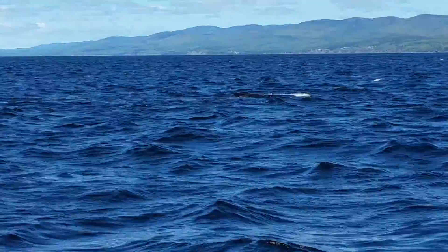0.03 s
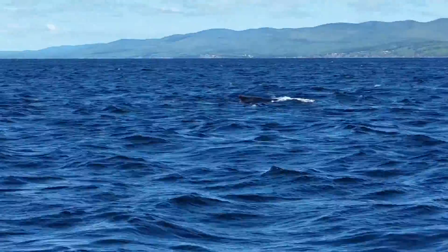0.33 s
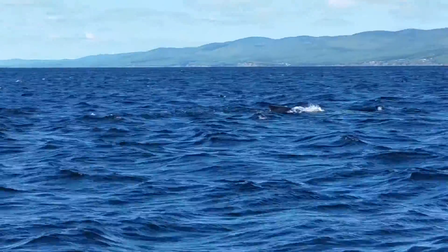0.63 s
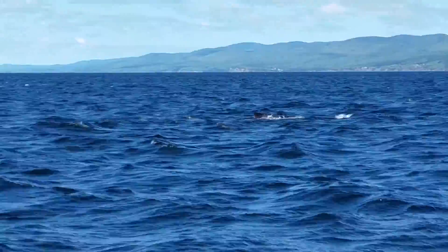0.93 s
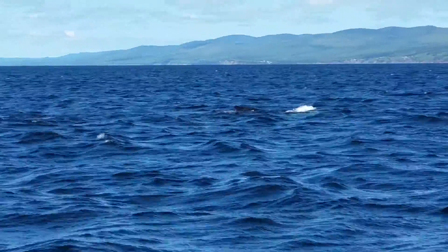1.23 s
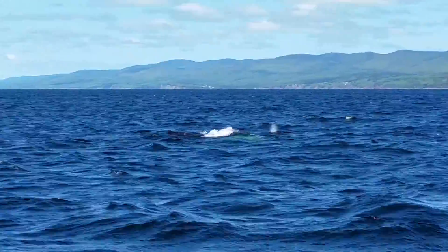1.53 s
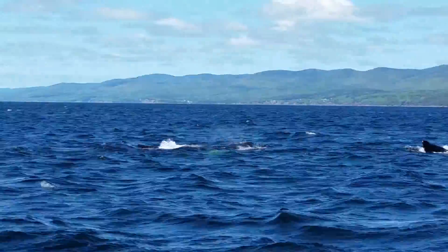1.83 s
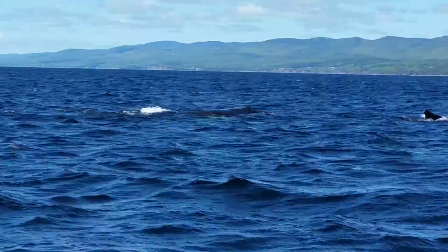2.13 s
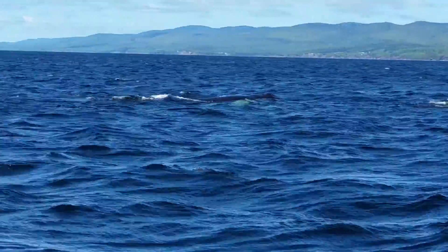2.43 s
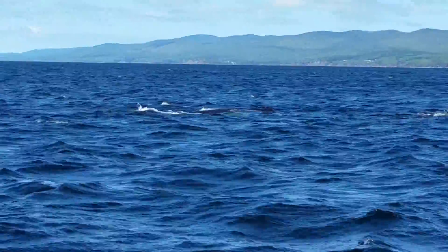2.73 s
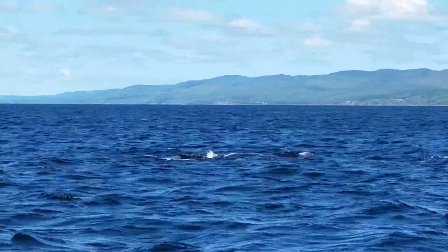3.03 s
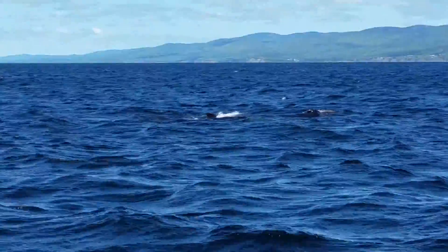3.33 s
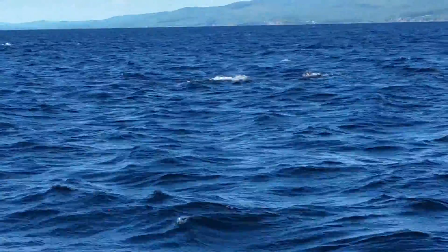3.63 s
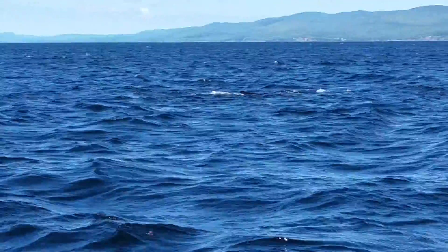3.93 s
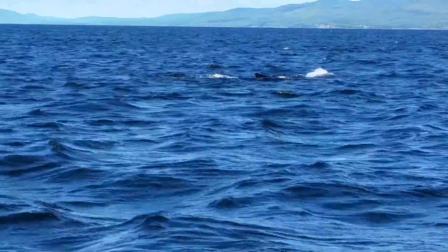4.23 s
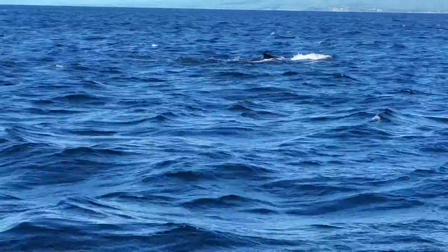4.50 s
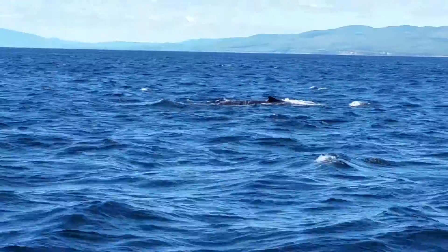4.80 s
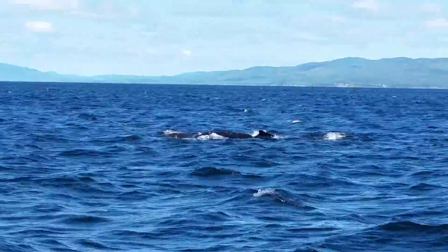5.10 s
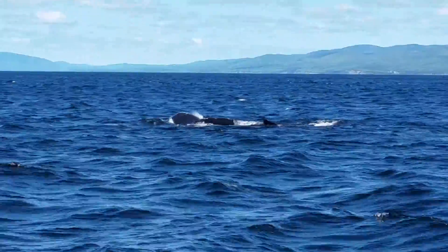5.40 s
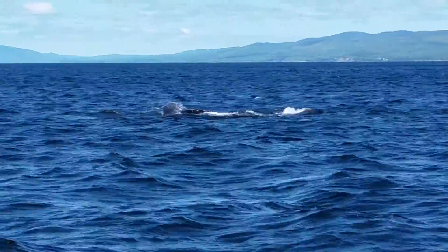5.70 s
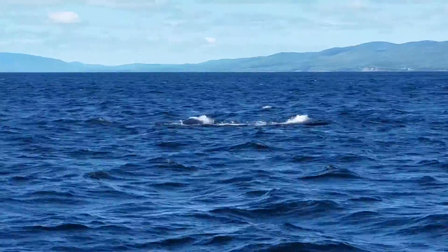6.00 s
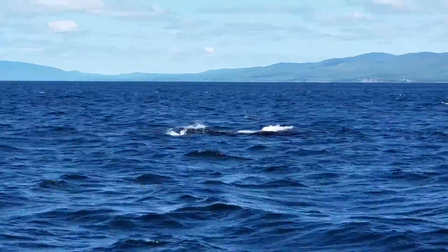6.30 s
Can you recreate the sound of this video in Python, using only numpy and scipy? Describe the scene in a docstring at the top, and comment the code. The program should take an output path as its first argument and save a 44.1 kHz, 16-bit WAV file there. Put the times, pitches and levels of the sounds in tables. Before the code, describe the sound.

Choppy sea sloshes against an idling small boat, with soft bursts of splashing spray and gusty wind buffeting the microphone.

```python
"""A small boat idles on a choppy sea, heard on deck through a stereo microphone.
From the start, wind eddies thump and pop on its ports, mostly the left, over engine hum and hull rumble.
Soon the chop picks up: waves slosh along the hull, trapped air gurgles, stray drops splat on the deck,
and every second or so a crest breaks into a bubbly wash and fizzing spray.
Near the end a strong gust buffets both ports, and at about 6 s the biggest crest breaks."""
import sys
import numpy as np
from scipy import signal
from scipy.fft import rfft, irfft, next_fast_len
from scipy.io import wavfile
from scipy.ndimage import uniform_filter1d, minimum_filter1d

SR = 44100
rng = np.random.default_rng(int(sys.argv[2]) if len(sys.argv) > 2 else 0)


def master_out(mix):
    """Clip the mix to full scale and print it as 16-bit PCM to the path in sys.argv[1]."""
    frames = np.transpose(np.atleast_2d(mix))
    ceiling = np.clip(frames, -1, 1)
    pcm = np.round(ceiling * 32767).astype(np.int16)
    wavfile.write(sys.argv[1], SR, pcm)


N = 288855
TIME = np.arange(N) / SR

# Levels in the tables are relative: each layer adds its own trim.
# The idling engine's tones. Each row: frequency in Hz, level in dB.
ENGINE_ORDERS = [(33.3, -44), (66.6, -35.5), (99.9, -41)]
# Tone colours of hull, slosh, mist and a drop's splat. Each row: frequency in Hz, gain in dB.
RUMBLE_EQ = [(15, -31.5), (35, 11), (52, -3), (68, 22), (90, -9.5), (140, -3.5), (220, -11.5), (400, -18),
             (900, -113.5)]
SLOSH_EQ = [(40, -4), (120, 12), (220, 7), (330, 4.5), (480, 0), (700, -1.5), (900, -10), (1400, -23.5),
            (3000, -89)]
MIST_EQ = [(7000, -53), (11000, -21), (13000, -9), (15000, 1.5)]
SPLAT_EQ = [(1500, -31), (4500, -10), (8000, -20), (11000, 13), (15000, -1)]
# Wash and spray as the ports colour them. Each row: frequency in Hz, left gain in dB, right gain in dB.
WASH_EQ = [(300, -22, -41), (740, -3, 0.5), (1460, 5.5, 5.5), (1780, 2, 0.5), (2250, 0, 2),
           (3060, -16.5, -7), (3470, -20.5, -9.5), (4210, -7.5, -19.5), (5300, -27.5, -22.5),
           (7000, -49.5, -45.5), (12000, -47.5, -43.5)]
SPRAY_EQ = [(400, -32.5, -29), (1300, -7, -23), (1650, -10, -24), (2100, -8.5, -14), (2600, -25.5, -19),
            (3150, -36.5, -6.5), (4100, -17, -6.5), (4750, -26.5, -13), (6030, -24.5, -10),
            (8220, -23, -21), (10230, -2, -15), (11200, 0, -10), (14300, -8, -2), (15000, -12.5, 3)]
# The large bubbles' part of the wash, and the coarse drops' part of the spray.
# Each row: frequency in Hz, gain in dB.
BODY_EQ = [(600, -21), (950, -7), (1400, 3), (1900, -17)]
COARSE_EQ = [(7500, -8), (10000, -16)]
# Fine mist drifting past. Each row: time in seconds, level in dB.
MIST_FADER = [(0, -79.5), (.55, -53), (1.1, -53), (2, -69), (3.4, -47), (4, -46), (4.7, -60), (5, -50),
              (5.3, -46), (5.7, -52), (6.55, -44)]
# The bed of wind on the ports. Each row: time in seconds, left level in dB, right level in dB.
WIND_FADER = [(0, -21, -15.5), (.3, -8, -42), (.52, -23.5, -26), (.75, -37.5, -34), (1, -22, -37),
              (1.2, -23, -50), (1.42, -22, -15.5), (1.8, -16, -27), (2.8, -24, -27), (3.2, -14, -20.5),
              (3.9, -13.5, -26.5), (4.3, -16.5, -22), (4.6, -18, -38), (4.95, -28, -26.5),
              (5.25, -13.5, -20.5), (5.68, -7.5, -13.5), (6, -23.5, -25), (6.55, -26, -26.5)]
# The hardest eddies. Each row: peak time in seconds, length in seconds, level in dB, corner in Hz,
# level of the pop in dB, port (0 left, 1 right).
HARD_EDDIES = [(0.074, 0.04, -6.5, 265, -15, 0), (0.103, 0.039, -10.5, 260, -19.5, 0),
               (0.147, 0.014, -6, 227, -20, 0), (0.187, .03, -12.5, 260, -27.5, 0),
               (0.254, 0.012, -11.5, 235, -19.5, 0), (0.283, 0.01, -17, 223, -17, 0),
               (.301, 0.017, -13.5, 300, -22.5, 0), (0.348, 0.022, -12, 200, -16.5, 0),
               (0.394, 0.022, -7, 188, -21.5, 0), (0.583, 0.12, -23.5, 160, -52, 0),
               (0.873, .06, -22.5, 177, -50, 0), (0.931, 0.041, -21, 224, -31, 0),
               (1.056, 0.035, -21, 157, -49, 1), (1.366, 0.027, -20.5, 255, -42, 0),
               (1.428, 0.042, -15, 160, -42, 0), (1.653, 0.032, -7, 160, -35, 0),
               (1.735, 0.014, -6.5, 183, -11, 0), (1.77, 0.027, -4.5, 172, -19, 0),
               (1.863, 0.021, -14.5, 206, -23.5, 0), (2.002, 0.016, -6, 235, -19.5, 0),
               (2.167, 0.02, -17.5, 190, -24, 0), (2.411, 0.014, -13, 155, -61, 0),
               (2.714, 0.022, -14.5, 190, -15.5, 0), (2.987, 0.028, -6, 132, -42, 0),
               (3.185, 0.016, -3, 177, -36, 0), (3.273, 0.031, -16.5, 160, -38, 1),
               (3.374, 0.016, -2, 163, -16, 0), (3.428, 0.0083, -14, 190, -18.5, 0),
               (3.746, 0.014, -6.5, 200, -25, 0), (3.829, 0.016, -10.5, 177, -23, 0),
               (3.886, .016, -5, 161, -11, 0), (4.045, 0.018, -1, 208, -9, 0),
               (4.159, 0.01, -17, 230, -16, 0), (4.2, 0.0094, -12, 175, -12, 0),
               (4.719, 0.015, -15.5, 130, -52, 1), (4.829, 0.028, -22, 170, -29.5, 0),
               (5.178, .022, -17.5, 125, -35, 1), (5.238, 0.029, -12, 138, -28, 0),
               (5.564, 0.034, -0.5, 185, -18, 0), (5.713, 0.024, -6, 163, -36, 1),
               (5.744, .02, -5, 104, -38, 1), (5.804, 0.0314, -10.5, 200, -16, 0)]
# How hard the chop works the hull; rumble, slosh, wash, foam and spray all ride on it.
# Each row: time in seconds, level in dB.
CHOP_FADER = [(0, -58.5), (.55, -55), (1.1, -54), (1.4, -51.5), (1.95, -50.5), (2.08, -48), (2.42, -48),
              (2.62, -48), (3.2, -47), (3.5, -48), (3.85, -44), (4.3, -54.5), (4.85, -59), (5.15, -52.5),
              (5.4, -46.5), (5.55, -45.5), (5.68, -42.5), (5.8, -43), (6.55, -44.5)]
# Air that waves trap at the hull. Each row: start in seconds, pitch in Hz, level in dB.
AIR_POCKETS = [(.945, 598, -37), (1.2, 683, -38), (2.025, 582, -34), (2.405, 452, -34.5),
               (3.649, 431, -32.5), (4.3, 367, -43), (4.96, 714, -44.5), (5.615, 1317, -36),
               (5.66, 1140, -35.5), (5.68, 726, -26.5), (6.21, 413, -34)]
# Drops landing close by. Each row: start in seconds, peak level in dB.
DECK_DROPS = [(.872, -35), (.896, -32), (.933, -35), (.94, -41), (2.372, -29), (3.107, -25), (3.985, -30),
              (4.281, -31), (4.489, -35), (4.534, -30), (4.573, -39), (6.411, -19)]
# Breaking crests. Each row: middle of the hold in seconds, hold in seconds, build in dB per second,
# spray, wash and foam levels in dB, foam pitch in Hz, the spray's pan as left minus right in dB.
BREAKERS = [(0.561, .14, 79, -47, -57, -52.5, 3580, -2.5), (1.617, .1, 52, -38.5, -42, -50.5, 3440, 0),
            (1.684, 0.025, 217, -35.5, -53, -45, 3600, -4.5), (2.38, 0.11, 70, -47.5, -56, -62, 3120, 5),
            (2.912, .12, 136, -34.5, -47, -43, 2510, 1.5), (3.327, 0.38, 81.5, -59, -56, -50, 4270, -8),
            (4.135, .15, 108.5, -38, -59, -48.5, 2840, -2), (4.562, .07, 150, -57, -53.5, -70, 2960, 8),
            (5.444, 0.093, 96, -60.5, -50, -54, 4210, -15),
            (6.059, 0.17, 125, -22.5, -37.5, -40.5, 3820, 3)]

ROUGH_DB = -47  # the chop level that counts as rough water


def undb(db):
    """Decibels to gain."""
    return 10 ** (np.asarray(db) / 20)


def unit(x):
    """Scale to rms 1."""
    return x / np.sqrt(np.mean(x ** 2) + 1e-18)


def together(*levels_db):
    """Level in dB of unrelated sounds heard at once."""
    return 10 * np.log10(sum(undb(db) ** 2 for db in levels_db) + 1e-18)


def blend(levels_db, values):
    """Average the values, each weighted by the power of its sound."""
    power = undb(levels_db) ** 2
    return np.asarray(values) @ power / power.sum(axis=0)


def faders(table):
    """Each level column as a fader ride, in straight lines between its points."""
    times, *columns = np.transpose(table)
    return np.array([np.interp(TIME, times, levels) for levels in columns])


def colour(x, eq):
    """Apply an EQ curve with one dB column, or one for each channel."""
    hz, *columns = np.transpose(eq)
    size = next_fast_len(x.shape[-1])
    log_hz = np.log(np.arange(size // 2 + 1) * SR / size + 1e-3)
    gain = undb([np.interp(log_hz, np.log(hz), db) for db in columns])
    return irfft(rfft(x, size) * gain, size)[:, :x.shape[-1]]


def drift(rate_hz):
    """Smooth random wobble of rms 1."""
    step = max(int(SR / rate_hz), 2)
    held = np.repeat(rng.standard_normal(N // step + 2), step)
    return unit(uniform_filter1d(held, step)[:N])


def add(track, start_s, sound):
    """Mix a one-shot into a track."""
    start = max(int(start_s * SR), 0)
    part = sound[..., :max(N - start, 0)]
    track[..., start:start + part.shape[-1]] += part


def at_ports(x, lag_s):
    """Sound from the left side of the boat reaches the right port a little later."""
    return np.array([x, np.interp(TIME - lag_s, TIME, x)])


def engine():
    """Low, slightly unsteady engine orders over a hull that rumbles more in a rough sea."""
    wavering_time = np.cumsum(1 + 0.02543 * drift(9)) / SR
    hum = sum(undb(db + 0.83 * drift(11)) * unit(np.sin(2 * np.pi * hz * wavering_time))
              for hz, db in ENGINE_ORDERS)
    rumble_db = -32 + 0.94 * (faders(CHOP_FADER)[0] - ROUGH_DB)
    rumble = unit(colour(rng.standard_normal(N), RUMBLE_EQ))
    return undb(-1) * hum + undb(rumble_db) * rumble


def mist():
    """The finest droplets make a thin, airy hiss on the right."""
    hiss = unit(colour(rng.standard_normal(N), MIST_EQ))
    trim_db = np.array([[-14], [-1]])
    return hiss * undb(faders(MIST_FADER) + 1.2 * drift(20) + trim_db)


def turbulence(noise, corner_hz, low_cut_hz):
    """Pressure on a port: flat from the low cut to a corner set by air speed, then falling steeply."""
    size = next_fast_len(noise.shape[-1])
    hz = np.arange(size // 2 + 1) * SR / size + 1e-3
    power = 1 / (1 + (hz / corner_hz) ** 6) / (1 + (low_cut_hz / hz) ** 4)
    return irfft(rfft(noise, size) * np.sqrt(power), size)[..., :noise.shape[-1]]


def small_eddies(wind_db, count):
    """Cues for weak eddies at random times, their level riding on the wind bed."""
    rows = []
    for k, (late, stretch, weakness, speed) in enumerate(rng.random((count, 4))):
        peak = int((k + late) / count * (N - 1))
        length_s = 0.019 * (.5 + stretch)
        corner_hz = 160 * 2 ** (speed - .5)
        rows.append((peak / SR, length_s, wind_db[peak] - 2 * weakness, corner_hz))
    return rows


def eddies(rows, trim_db):
    """Thumps of turbulence that rise faster than they die; small fast ones are brighter, with less bass."""
    out = np.zeros(N)
    t = (np.arange(8192) - 4096) / SR
    for peak_s, length_s, db, corner_hz, *_ in rows:
        width_s = length_s * np.where(t < 0, .68, .95)
        swell = np.exp(-np.log(4) * np.abs(t / width_s) ** 2.6)
        low_cut_hz = 26 * (corner_hz / 170) ** 0.21
        pressure = turbulence(rng.standard_normal(len(t)), corner_hz, low_cut_hz)
        thump = unit(pressure * swell) * np.sqrt(np.mean(swell ** 2))
        start_s = peak_s + t[0]
        skip = max(int(-start_s * SR), 0)
        add(out, start_s, undb(db + trim_db) * thump[skip:])
    return out


def pops(rows):
    """A vortex core crosses the port as one sharp pressure pulse; a run of them makes a tearing sound."""
    out = np.zeros(N)
    lead_s = .04
    hz = np.arange(4097) * SR / 8192
    port_highpass = (1j * hz / (1j * hz + 260)) ** 2
    for peak_s, eddy_s, _, corner_hz, db, _ in rows:
        length_s = .26 * eddy_s
        rolloff_hz = 243.5 * (corner_hz / 200) ** 1.98  # faster eddies pop brighter
        count = int(np.clip(length_s / .003, 1, 8))
        late, polarity = rng.random((2, 8))[:, :count]
        pulse_s = lead_s + length_s * ((np.arange(count) + .2 + .6 * late) / count - .5)
        spectrum = np.sign(polarity - .5) @ np.exp(-2j * np.pi * np.outer(pulse_s, hz))
        pop = irfft(spectrum * port_highpass * np.exp(-hz / rolloff_hz))
        add(out, peak_s - lead_s, undb(db) * pop * np.sqrt(length_s * SR / np.sum(pop ** 2)))
    return out


def wind():
    """A bed of fluttering flow, unrelated at the two ports, with eddies and their pops on top."""
    wind_db = faders(WIND_FADER)
    flutter = undb(2.83 * np.array([drift(28), drift(28)]))
    flow = turbulence(rng.standard_normal((2, N)), corner_hz=133, low_cut_hz=47.6)
    out = unit(flow * flutter) * undb(wind_db + np.array([[-5.2], [-4.2]]))
    for port, trim_db in enumerate([2.53, 1.8]):
        hard = [row for row in HARD_EDDIES if round(row[-1]) == port]
        weak = small_eddies(wind_db[port], count=20)
        out[port] += eddies(hard + weak, trim_db) + pops(hard)
    return out


def drops():
    """Single drops splat on the deck and break into finer ones."""
    out = np.zeros((2, N))
    t = np.arange(2048) / SR
    snap_and_tail = np.exp(-t / 0.0022) + .15 * np.exp(-t / 0.0098)
    for start_s, db in DECK_DROPS:
        splat = colour(rng.standard_normal((2, len(t))), SPLAT_EQ) * snap_and_tail
        add(out, start_s, undb(db) * splat / np.abs(splat).max())
    return out


def bubble(hz, cycles, glide):
    """A ringing air pocket; its pitch rises as it nears the surface."""
    age = np.linspace(0, 1, int(cycles * SR / hz) + 2)
    chirp = np.sin(2 * np.pi * cycles * (age + glide * age ** 2 / 2))
    attack = 1 - np.exp(-age * cycles)
    return chirp * attack * np.exp(-np.log(100) * age)


def bubble_cloud(low_hz, high_hz, cycles, spread_db, count):
    """Bubbles of all sizes, scattered between left and right."""
    out = np.zeros((2, N))
    for when, pitch, weakness, left_share, life in rng.random((count, 5)):
        ring = bubble(low_hz * (high_hz / low_hz) ** pitch, cycles * (.5 + life), glide=0.16)
        pan = np.sqrt([[left_share], [1 - left_share]])
        add(out, when * N / SR, pan * undb(-spread_db * weakness) * ring)
    return unit(out)


def gurgles():
    """A trapped pocket of air breaks into a quick run of bubbles of nearly one size."""
    out = np.zeros(N)
    for start_s, hz, db in AIR_POCKETS:
        for k, (late, detune) in enumerate(rng.random((4, 2))):
            ring = bubble(hz * (1 + 0.14 * (detune - .5)), cycles=54, glide=0.21)
            add(out, start_s + 0.014 * (k + late), undb(db - 0.5 * k) * ring)
    return out


def slosh(level_db):
    """Water heaving against the hull: a churn much alike at both ports, and big glugging bubbles."""
    noise = at_ports(rng.standard_normal(N), lag_s=0.0002) + 0.44 * rng.standard_normal((2, N))
    churn = unit(colour(noise * undb(2 * drift(35)), SLOSH_EQ))
    glugs = bubble_cloud(low_hz=270, high_hz=620, cycles=18, spread_db=14, count=520)
    return undb(level_db) * (undb(2) * churn + undb(-6) * glugs)


def wash(level_db, body_db, pan_db):
    """Crests tumbling into foam: a rush full of small bubbles, swaying gently with the spray's pan."""
    rush = unit(rng.standard_normal((2, N)) + 0.88 * at_ports(rng.standard_normal(N), lag_s=0.00033))
    froth = undb(-17) * bubble_cloud(low_hz=900, high_hz=4500, cycles=14, spread_db=16, count=3600)
    water = unit(colour(rush * undb(1.78 * drift(30)) + froth, WASH_EQ))
    water += colour(water, BODY_EQ) * (undb(body_db) - 1)
    lean_db = 0.12 * (pan_db - 4.5) * np.array([[1], [-1]])
    return undb(level_db + lean_db) * water


def foam(level_db, pitch_hz):
    """Foam fizzes in a band set by the size of its bubbles, which changes from wave to wave."""
    out = np.zeros((2, N))
    for hz in np.geomspace(2300, 4400, num=9):
        noise = rng.standard_normal((2, N)) + 0.71 * at_ports(rng.standard_normal(N), lag_s=0.00037)
        band = unit(colour(noise, [(hz / 1.2, -60), (hz / 1.04, 0), (hz * 1.04, 0), (hz * 1.2, -60)]))
        out += band * np.exp(-(np.log(hz / pitch_hz) / 0.22) ** 2)
    return undb(level_db - 7.5) * unit(out)


def spray(level_db, pan_db, clicks_per_s=2500):
    """Countless droplets and bursting foam cells, each a tiny click, over a smooth hiss."""
    hiss = rng.standard_normal((2, N))
    sizes = undb(3.6 * np.minimum(rng.exponential(size=(2, N)), 4.5))
    clicks = rng.standard_normal((2, N)) * sizes * (rng.random((2, N)) < clicks_per_s / SR)
    fizz = colour((hiss + undb(-3.5) * unit(clicks)) * undb(drift(45)), SPRAY_EQ)
    fizz = np.array([unit(channel) for channel in fizz])
    # a weak crest throws only fine mist, without the coarse drops that sound lower
    fizz -= colour(fizz, COARSE_EQ) * (1 - undb(0.12 * (level_db + 25)))
    fizz *= undb(.9 * drift(16))
    left_share = 1 / (1 + undb(-pan_db) ** 2)
    pan = np.sqrt(2 * np.array([left_share, 1 - left_share]))
    return undb(level_db - 0.67) * pan * fizz


def crest_envelope(middle_s, hold_s, build_db_per_s):
    """Envelope in dB of a crest that builds, holds and drains, leaving a softer tail of fizz."""
    before_s = np.maximum(middle_s - hold_s / 2 - TIME, 0)
    after_s = np.maximum(TIME - middle_s - hold_s / 2, 0)
    drain_db = -69.5 * after_s
    tail_db = -11.5 - 17.5 * after_s
    return together(drain_db, tail_db) - build_db_per_s * before_s


def sea():
    """The chop keeps the water moving; laps at the hull and breaking crests swell over it."""
    chop_db = faders(CHOP_FADER)[0]
    middle_s, hold_s, build, spray_db, wash_db, foam_db, foam_hz, crest_pan_db = np.transpose(BREAKERS)
    envelopes = np.array([crest_envelope(*crest) for crest in zip(middle_s, hold_s, build)])
    # each wave that traps an air pocket also laps the hull
    laps_db = together(*(db + 10 * np.log10(np.exp(-((TIME - lap_s) / 0.041) ** 2) + 1e-18)
                         for lap_s, _, db in AIR_POCKETS))
    breaking_db = together(*(wash_db[:, None] + envelopes))
    # each list holds the chop's level first, then the crests'
    washes = [together(chop_db, laps_db - 16.5), breaking_db]
    foams = [chop_db - 16.5, *(foam_db[:, None] + envelopes)]
    sprays = [-52 + 1.27 * (chop_db - ROUGH_DB), *(spray_db[:, None] + envelopes)]
    pan_db = blend(sprays, [0, *crest_pan_db])
    return (slosh(together(chop_db + 9, laps_db - 2.5, breaking_db + 2))
            + wash(together(*washes), body_db=blend(washes, [-1.5, -5.5]), pan_db=pan_db)
            + foam(together(*foams), pitch_hz=blend(foams, [3970, *foam_hz]))
            + spray(together(*sprays), pan_db))


def scene():
    """The stereo mix of wind, engine and water."""
    return wind() + engine() + sea() + gurgles() + mist() + drops()


def record(dry):
    """A limiter ducks both channels under the hardest thumps; a steep low-pass shaves off the top."""
    ceiling, hold, top_hz = 0.79, int(.014 * SR), 16000
    gain = np.minimum(1, ceiling / (np.abs(dry).max(axis=0) + 1e-9))
    limited = dry * uniform_filter1d(minimum_filter1d(gain, hold), hold)
    return signal.sosfilt(signal.ellip(10, .2, 80, top_hz, fs=SR, output="sos"), limited)


dry = scene()
out = record(dry)
master_out(out)
```